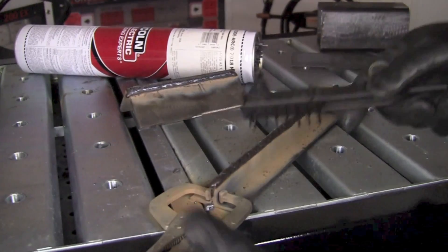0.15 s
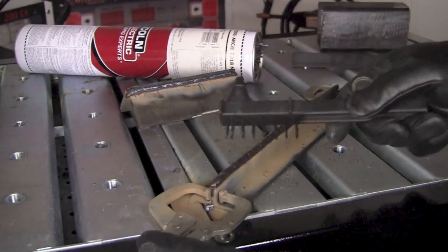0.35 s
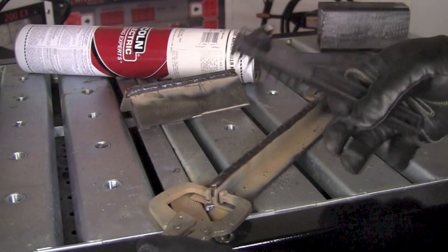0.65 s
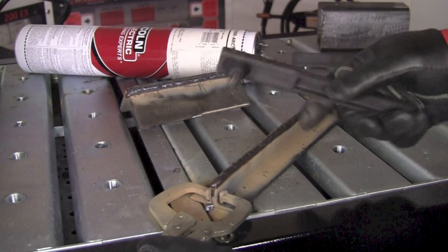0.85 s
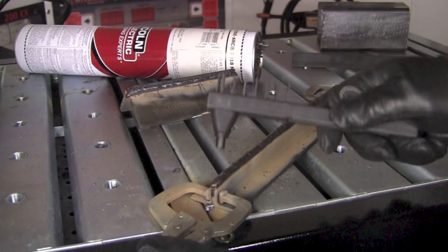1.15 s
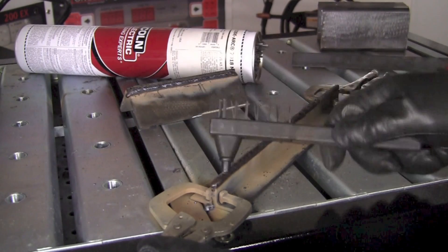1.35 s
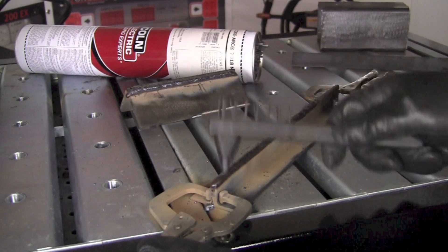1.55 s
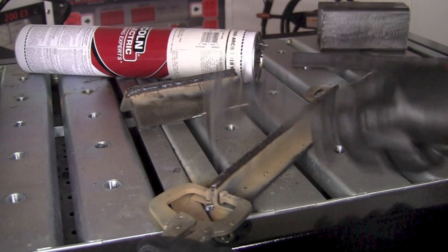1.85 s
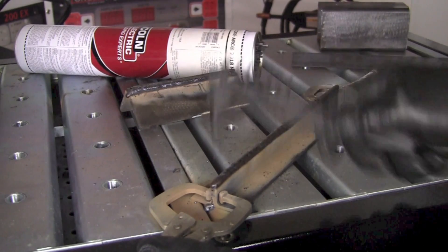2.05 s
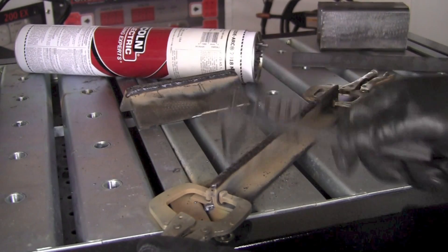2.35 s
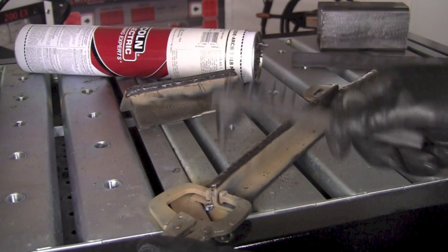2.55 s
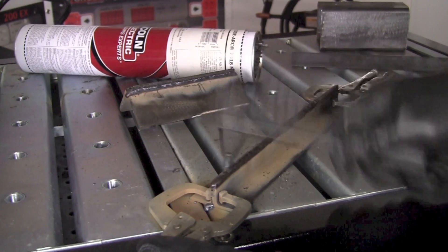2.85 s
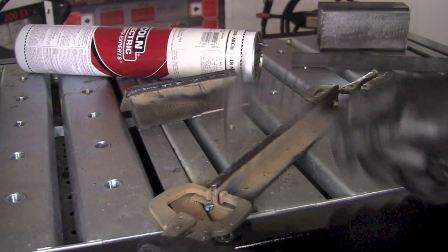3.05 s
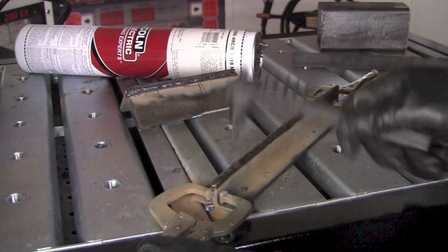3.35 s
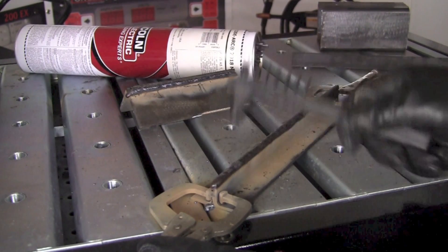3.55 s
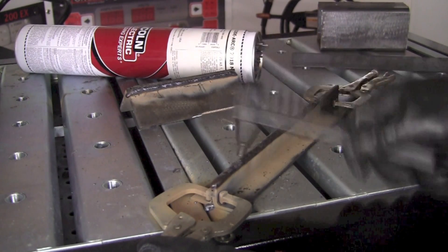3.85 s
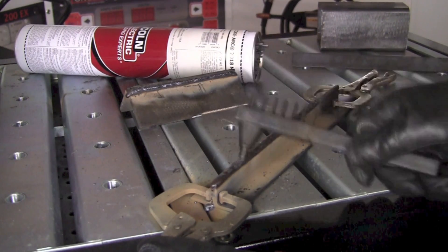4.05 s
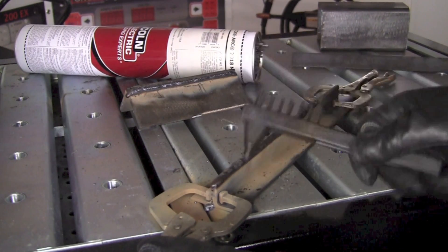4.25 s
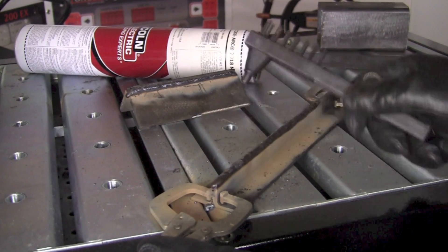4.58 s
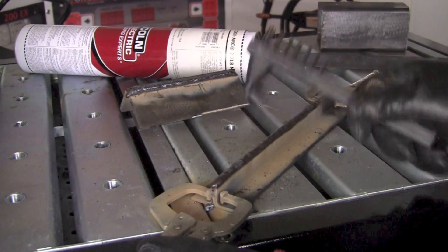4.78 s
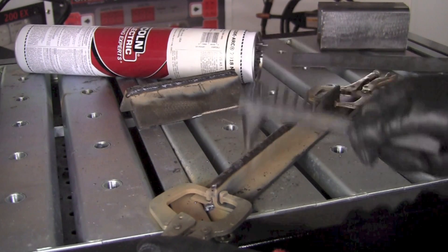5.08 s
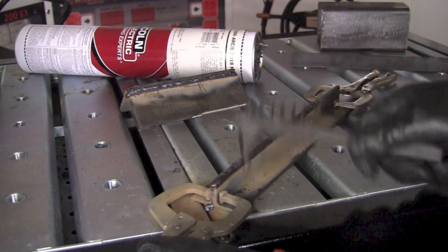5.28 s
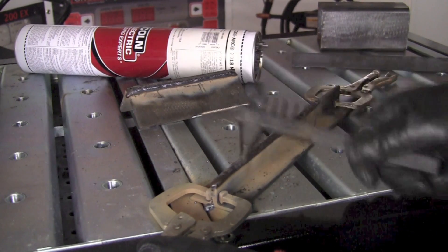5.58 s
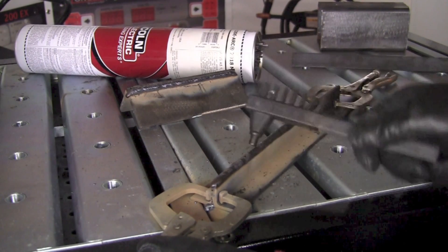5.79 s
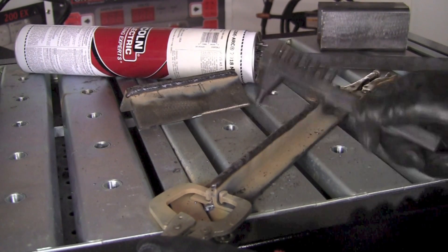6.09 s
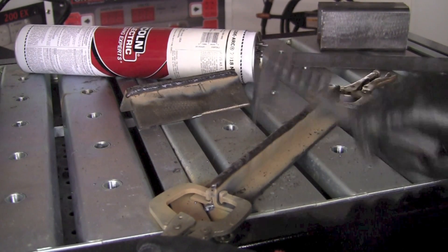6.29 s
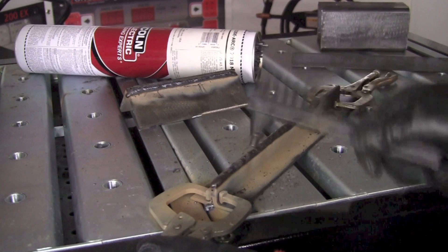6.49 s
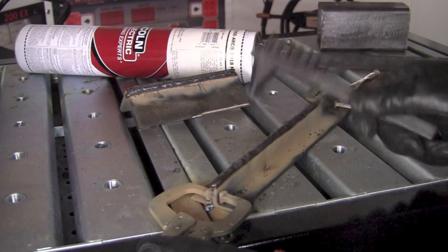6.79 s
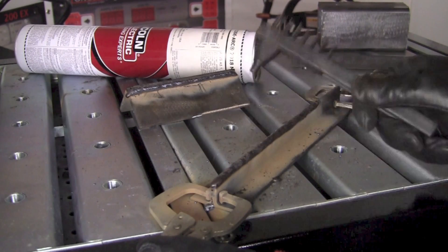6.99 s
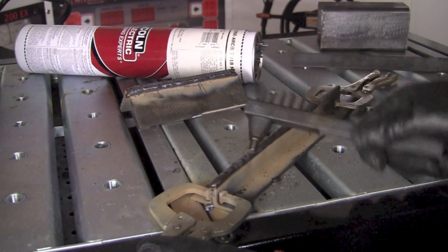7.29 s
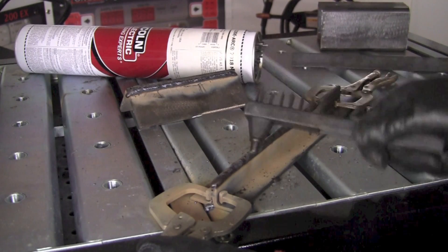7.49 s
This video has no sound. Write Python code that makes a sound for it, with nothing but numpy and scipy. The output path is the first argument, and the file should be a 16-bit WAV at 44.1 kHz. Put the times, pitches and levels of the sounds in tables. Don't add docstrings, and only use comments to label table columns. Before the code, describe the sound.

Steady airy fan hum opens the scene with a dull knock and thin ticks of loose steel. A short wait follows, then fast, even chipping blows ring on welded steel, crisp and piercing with little bass. The first blows ring longer; later ones are somewhat softer and drier, with a few double hits as the edge skids. Close microphone, centred sound, short hard room echo, background ducked down.

```python
import sys
import numpy as np
from scipy import signal
from scipy.fft import rfft, irfft, next_fast_len
from scipy.io import wavfile
from scipy.ndimage import uniform_filter1d

SR = 44100
rng = np.random.default_rng(int(sys.argv[2]) if len(sys.argv) > 2 else 0)


def field_ratio(decibels):
    return 10 ** (np.asarray(decibels, dtype=float) / 20)


def transcribe(signal):
    frames = np.atleast_2d(signal).T
    limited = np.clip(frames, -1, 1)
    pcm = np.round(limited * 32767).astype(np.int16)
    wavfile.write(sys.argv[1], SR, pcm)


N = 336483

# pitch_hz, density_db_per_hz
FAN_DRONE = [(40, -32), (85, -19), (100, -8.5), (150, -5), (165, 3.5), (182, -5), (201, 8), (232, -11),
             (264, -1), (300, -7.5), (385, -1.5), (417, 1), (491, 1), (560, -6.5), (700, -51)]
AIR_HISS = [(310, -33), (520, -6), (584, -12), (720, -9), (954, -8), (1040, -15), (1270, -15), (1750, -20),
            (2620, -22), (3030, -20), (4400, -24), (7000, -26), (9500, -34), (12500, -47), (15900, -65)]
# start_s, peak_db, pitch_hz, knock_db, t60_s
CLINKS = [(.125, -37, 7200, -30.5, 0.24), (.2533, -15, 7340, -28, 0.011), (.378, -26, 6300, -18, .04),
          (.3985, -23, 7500, -23, 0.016), (.399, -25, 10500, -20.5, 0.016),
          (.4219, -32, 5700, -23.5, 0.056), (.4364, -36, 6500, -31, .012), (.5656, -26.5, 6200, -52, 0.082),
          (.567, -42, 10300, -35, 0.087), (0.572, -40, 9000, -50, 0.075), (.5794, -34, 7840, -29, 0.1),
          (.7594, -41, 6940, -40, .1), (.9308, -24, 6500, -32, .02), (1.4194, -51, 4000, -31, .06),
          (5.918, -12, 7470, -60, 0.043), (6.0003, -34.5, 6960, -48, 0.1)]
# pitch_hz, level_db, t60_s
KNOCK_MODES = [(415, -2, 0.063), (503, -3.5, 0.18), (699, -2.5, 0.07), (964, -12, 0.096),
               (1260, -3.5, 0.046), (1490, -17, 0.075), (1930, -10.5, 0.039), (2300, -12, 0.034),
               (2730, -14, 0.031)]
# start_s, pitch_hz, level_db, t60_s
LOOSE_CLAMP = (5.918, 3790, -38, .22)
# start_s, peak_db, clang_db, low_share_db
FAR_BLOWS = [(1.4773, -4.5, -22.5, -14), (1.6507, -8, -14.5, -12), (1.8325, -4, -20.5, -8.5),
             (2.0226, -7, -13.5, -11.5), (2.227, -7.5, -13, -13.5), (2.4243, -8, -11, -15.5),
             (2.6227, -8.5, -11, -16), (2.818, -5, -15.5, -16.5), (3.0142, -6, -14, -18),
             (3.2213, -6.5, -13.5, -18), (3.4157, -5.5, -14, -17.5)]
NEAR_BLOWS = [(3.6151, -7, -13.5, -14), (3.8198, -8, -13, -11.5), (4.0129, -7, -14, -12.5),
              (4.2004, -8.5, -12.5, -12.5), (4.3908, -9, -12, -15), (4.5868, -10, -14.5, -10.5),
              (4.789, -8, -13, -12), (4.98, -12.5, -9.5, -7.5), (5.1716, -9, -12, -11.5),
              (5.3698, -16, -4.5, -8.5), (5.5559, -8, -14.5, -12.5), (5.7373, -10.5, -10.5, -10.5),
              (5.9164, -11.5, -16.5, -15.5), (6.0967, -9.5, -12, -14.5), (6.2801, -8.5, -14.5, -15),
              (6.4624, -9.5, -11.5, -14), (6.6478, -8.5, -14, -15), (6.8251, -9.5, -12.5, -13.5),
              (7.0074, -8.5, -13.5, -15), (7.2016, -13.5, -8, -12), (7.4033, -9.5, -11.5, -13),
              (7.5954, -12, -10, -8.5)]
# start_s, peak_db, clang_db, low_share_db
SKIDS = [
    (5.385, -12, -26, -12),
    (5.3976, -14, -14, -12),
    (5.765, -19, -15, -26),
    (5.7755, -17, -7.5, -12.5),
]
SPOT_TIMES = [3.2, 4.0, 6.2]
MIRROR_DELAYS = [.001055, .00109, .00113]
EDGE_PITCHES = [5750, 6050, 6200]
# pitch_hz, density_db_per_hz
CRACK_SPECTRUM = [(180, -63), (300, -38), (1830, 3.5), (2600, -9.5), (3950, -16), (5910, 16), (8260, 4),
                  (9280, 2.5), (10300, 2), (13200, -24), (16400, -124)]
CLANG_SPECTRUM = [(100, -52), (190, -6), (300, -5), (500, 0), (640, -7), (900, -1), (1450, 2.5), (2000, 2),
                  (2150, -7.5), (2600, 5.5), (3900, 1), (6000, 3.5), (8600, 0), (13500, -24), (15000, -62)]
# pitch_hz, t60_in_hangs
CLANG_FADE = [(200, 2.7), (530, 2.57), (1400, 0.83), (3700, 0.84), (9700, 0.62), (15000, 1)]
# pitch_hz, far_db,
# middle_db, near_db, t60_s
STEEL_MODES = [(199, -21, -18, -21, .35), (308, -16, -18, -19, .3), (487, -15, -18, -17, .35),
               (909, -9, -21, -15, .2), (1003, -10, -14, -14, .2), (1340, -9, -20, -17, .15),
               (1407, -17, -11, -14, .15), (1480, -20, -10, -12, .13), (1765, -13, -22, -18, .2),
               (1846, -12, -8, -11, .14), (1886, -8, -13, -14, .14),
               (2440, -15, -10, -9, .12), (2530, -8, -8, -6, .14), (2700, -17, -11, -13, .25),
             (2850, -13, -9, -14, .14), (2923, -9, -21, -24, .2), (3075, -13, -13, -12, .2),
             (3253, -20, -13, -22, .15), (3736, -14, -15, -15, .22), (4000, -9, -16, -14, .16),
             (4105, -12, -18, -6, .16),
               (4242, -24, -23, -4, 0.16), (4446, -9, -9, -6, 0.14), (4505, -5, -12, -7, 0.2),
               (4873, -3, -22, -21, 0.13), (4950, -12, -13, -9, 0.15), (5420, -15, -15, -13, 0.22),
               (6070, -8, -11, -9, 0.14), (6285, -22, -24, -13, 0.12), (6900, -12, -6, -11, 0.14),
               (7418, -9, -19, -24, 0.2), (8500, -10, -6, -11, 0.12), (8634, -11, -9, -10, 0.14),
               (9215, -24, -14, -19, 0.13)]
# pitch_hz, t60_s
LONG_MODE = (5903, .23)
# time_s, level_db
BAR_FREEDOM = [(1.5, -8), (2.43, -7), (2.62, -2), (3.25, -2.5), (3.6, -14), (5.4, -28), (6.1, -5),
               (7.6, -26)]
# pitch_hz, t60_s
WALL_DECAY = [(200, 0.2), (1000, 0.73), (4000, 0.54), (9000, 0.39), (15000, 0.74)]
# pitch_hz, density_db_per_hz
ECHO_SPECTRUM = [(530, -16), (900, 1), (1070, -6), (1390, 3), (1510, -7), (1980, 0.5), (2540, -10),
                 (2750, -6), (4260, -6.5), (6200, -6.5), (15000, -44)]
# pitch_hz, density_db_per_hz
PREAMP_NOISE = [(20, 0.5), (60, -5.5), (200, -14), (1000, -20), (4000, -31.5), (10000, -23.5), (15600, -21),
                (15900, -120)]

FIRST_BLOW_S = FAR_BLOWS[0][0]
DUCK_DB, DUCK_S = -23.5, 0.71


def unit(x):
    return x / np.sqrt(np.mean(x ** 2) + 1e-20)


def along(points, hz):
    f, v = np.transpose(points)
    return np.interp(np.log(hz + 1), np.log(f + 1), v)


def coloured(x, gain):
    m = next_fast_len(len(x) + 8192)
    return irfft(rfft(x, m) * gain(np.fft.rfftfreq(m, 1 / SR)), m)[:len(x)]


def rush(spectrum, patchy_db):
    z = signal.stft(rng.standard_normal(N), nperseg=512)[2]
    field = uniform_filter1d(rng.standard_normal(z.shape), size=4, axis=0)
    field = uniform_filter1d(field, size=12, axis=1)
    x = signal.istft(z * field_ratio(patchy_db * unit(field)), nperseg=512)[1][:N]
    return unit(coloured(x, lambda hz: field_ratio(along(spectrum, hz))))


def dying(t60, level_db, noise):
    hz, t, z = signal.stft(noise, SR, nperseg=128)
    gain = field_ratio(level_db(hz))[:, None]
    decay = field_ratio(-60 * t / t60(hz)[:, None])
    return signal.istft(z * unit(gain) * decay, SR, nperseg=128)[1][:len(noise)]


def ring(hz, db, t60, t, phase=None):
    phase = rng.uniform(0, 2 * np.pi, np.shape(hz)) if phase is None else phase
    return np.sum(field_ratio(db - 60 * t / t60) * np.sin(2 * np.pi * hz * t + phase), axis=0)


def add(track, s, sound):
    part = track[round(s * SR):][:len(sound)]
    part += sound[:len(part)]


def openness(s):
    return np.exp(-np.maximum(s - FIRST_BLOW_S, 0) / DUCK_S)


def ducking(time):
    return field_ratio(DUCK_DB * (1 - openness(time)))


def fan():
    time = np.arange(N) / SR
    recover_s = 0.038
    dip = sum((time > s) * openness(s) * np.exp(-np.abs(time - s) / recover_s) for s, *_ in FAR_BLOWS)
    air = rush(FAN_DRONE, patchy_db=0.5) + field_ratio(-6.5) * rush(AIR_HISS, patchy_db=.8)
    return ducking(time) * field_ratio(-34 - 32 * dip) * air


def clinks():
    out, t = np.zeros(N), np.arange(SR // 4) / SR
    knock_hz, mode_db, knock_t60 = np.transpose(KNOCK_MODES)[:, :, None]
    scuff_db = [(150, -3), (500, 13), (1500, -3.0), (2700, -12), (4000, -39)]  # pitch_hz, density_db_per_hz
    for s, peak_db, hz, knock_db, t60 in CLINKS:
        life = max(t60, .01)
        tick = dying(lambda f: life + 0 * f, lambda f: -16 * np.abs(np.log2((f + 1) / hz)),
                     rng.standard_normal(len(t)))
        tick += field_ratio(-4) * ring(np.array([[hz]]), 0, 1.5 * life, t)
        knock = ring(knock_hz, mode_db + rng.normal(0, 0.85, knock_hz.shape), knock_t60, t)
        scuff = dying(lambda f: 0.16 + 0 * f, lambda f: along(scuff_db, f), rng.standard_normal(len(t)))
        knock += field_ratio(-5.0) * scuff
        onset = 1 - np.exp(-t / 0.0027)
        add(out, s, (field_ratio(peak_db - 11.0) * tick + field_ratio(knock_db - 3.5) * knock) * onset)
    start_s, pitch_hz, level_db, t60_s = LOOSE_CLAMP
    add(out, start_s, ring(np.array([[pitch_hz]]), level_db, t60_s, t))
    return out


def burst(u, hz, life):
    return (u > 0) * np.sin(2 * np.pi * hz * u) * (u / life) * np.exp(1 - np.abs(u) / life)


def snap(t, gap, edge_hz):
    hz, gap, mirror_db = rng.normal([edge_hz, gap, -3.5], [150, .000006, 1])

    def pulse(u):
        ping = burst(u, hz, .00018)
        click = field_ratio(-20) * burst(u, 12800, .00022)
        push = field_ratio(-9) * burst(u, 3200, .0002)
        return ping + click - push

    return pulse(t) + field_ratio(mirror_db) * pulse(t - gap)


def crack(s, t, grain):
    grit = dying(lambda f: 1 + 0 * f, lambda f: along(CRACK_SPECTRUM, f), grain)
    envelope = field_ratio(-60 * t / 0.016) * (1 - np.exp(-t / 0.000067))
    edge = snap(t, np.interp(s, SPOT_TIMES, MIRROR_DELAYS), np.interp(s, SPOT_TIMES, EDGE_PITCHES))
    return edge + field_ratio(-13.5) * grit * envelope


def hammer():
    out, t = np.zeros(N), np.arange(SR * 2 // 5) / SR
    first = t[:SR // 20]
    hz, *spot_db, t60 = np.transpose(STEEL_MODES)[:, :, None]
    grain = rng.standard_normal(len(t))
    phase = rng.uniform(0, 2 * np.pi, (2, *hz.shape))
    detune = rng.normal(1, .004, hz.shape)
    alike = .88
    swell = 1 - np.exp(-t / 0.00053)
    wall_swell = 1 - np.exp(-t / 0.045)
    for s, peak_db, clang_db, low_db in sorted(FAR_BLOWS + NEAR_BLOWS + SKIDS):
        hang_s = 0.23 + 0.19 * openness(s)
        bar_db = np.interp(s, *np.transpose(BAR_FREEDOM))
        tilt = lambda f: along([(1500, low_db + 15.5), (4000, 0.011)], f)
        shares = [np.interp(s, SPOT_TIMES, row) for row in np.eye(3)]
        db = np.tensordot(shares, spot_db, axes=1) + rng.normal(0, 2.2, hz.shape)
        db = db + tilt(hz)
        grain = alike * grain + np.sqrt(1 - alike ** 2) * rng.standard_normal(len(t))
        phase = phase + rng.normal(0, .4, phase.shape)
        clang = dying(lambda f: max(hang_s, .03) * along(CLANG_FADE, f),
                      lambda f: along(CLANG_SPECTRUM, f) + tilt(f), grain)
        twins = hz * detune * rng.normal(1, .001, hz.shape)
        modes = ring(hz, db, t60, t, phase[0]) + ring(twins, db - 2, t60, t, phase[1])
        bar = field_ratio(bar_db - 1.5) * ring(np.array([[LONG_MODE[0]]]), 0, LONG_MODE[1], t)
        walls = dying(lambda f: along(WALL_DECAY, f), lambda f: along(CLANG_SPECTRUM, f),
                      rng.standard_normal(len(t)))
        ringing = swell * (clang + field_ratio(-5.5) * modes + bar) + wall_swell * field_ratio(-13) * walls
        add(out, s, field_ratio(peak_db - 2) * crack(s, first, grain[:len(first)]))
        add(out, s, field_ratio(peak_db + clang_db - 3.0) * ringing)
    return out


def echo():
    time = np.arange(N) / SR
    since = np.maximum(time - FIRST_BLOW_S, 0)
    fill = 1 - np.exp(-since / 0.16)
    sag = field_ratio(-30 - 3 * since)
    return ducking(time) * fill * sag * rush(ECHO_SPECTRUM, patchy_db=2.0)


def scene():
    low_cut = signal.butter(6, 180, "high", fs=SR, output="sos")
    top_cut = signal.butter(4, 14500, fs=SR, output="sos")
    background = fan()
    steel = signal.sosfilt(np.vstack([low_cut, top_cut]), clinks() + hammer())
    return np.tile(steel + background + echo(), (2, 1))


def low_pass(x):
    return signal.sosfilt(signal.butter(12, 16550, fs=SR, output="sos"), x)


def record(dry):
    x = dry + field_ratio(-62) * np.array([rush(PREAMP_NOISE, patchy_db=-1) for side in dry])
    x = x / (1 + np.abs(x / .42) ** 4) ** (1 / 4)
    x = np.array([coloured(side, lambda hz: hz < 16550) for side in x])
    return low_pass(x)


dry = scene()
out = record(dry)
transcribe(out)
```